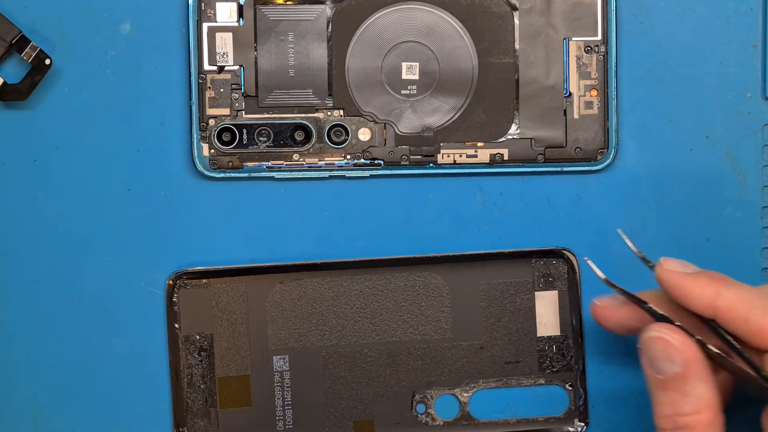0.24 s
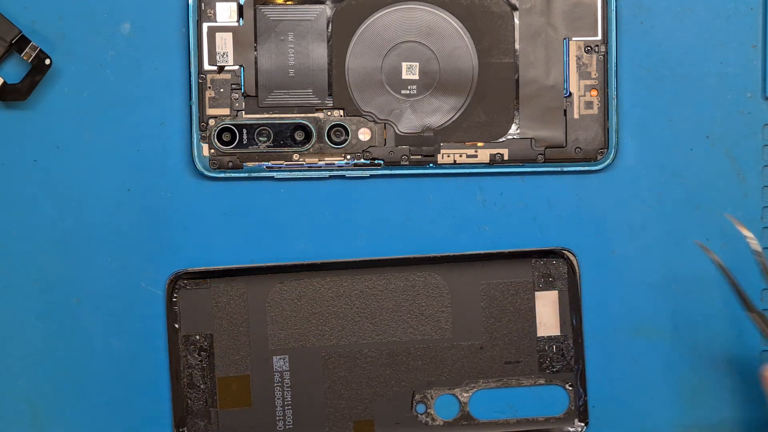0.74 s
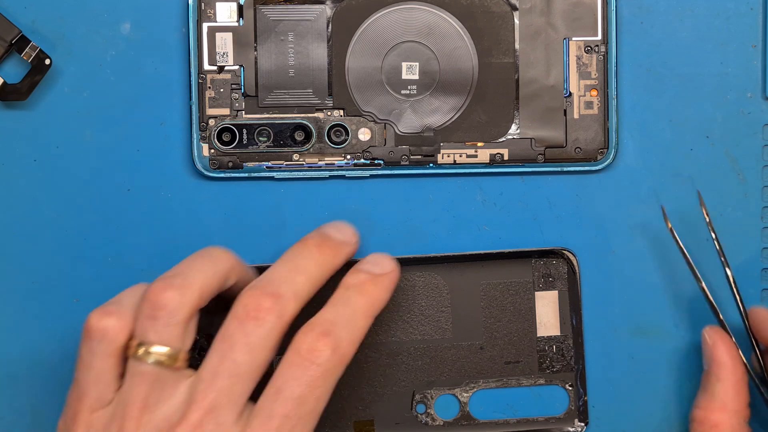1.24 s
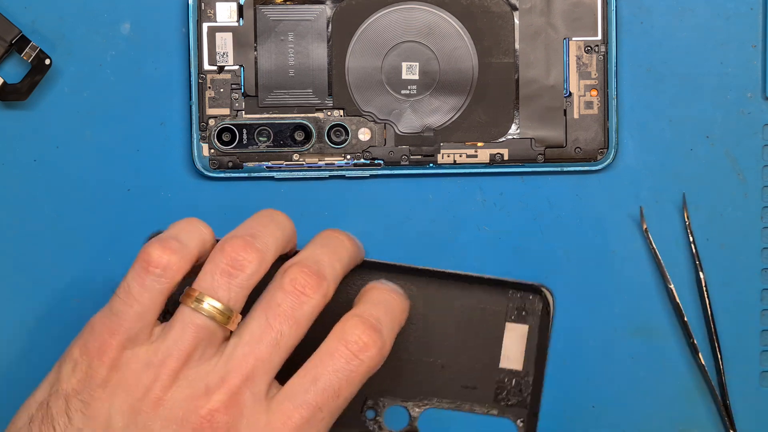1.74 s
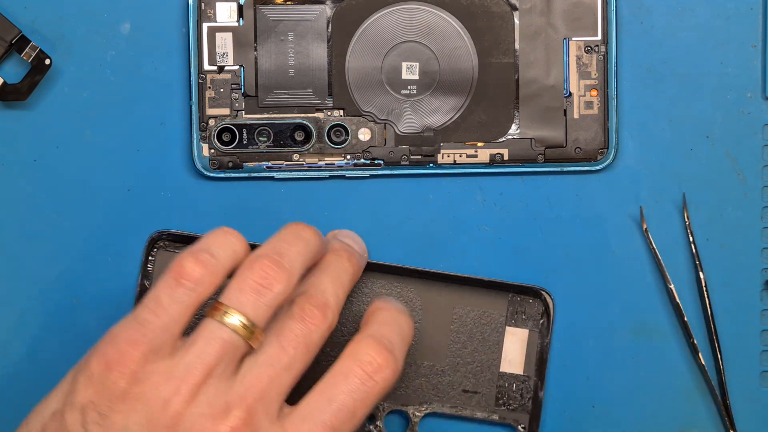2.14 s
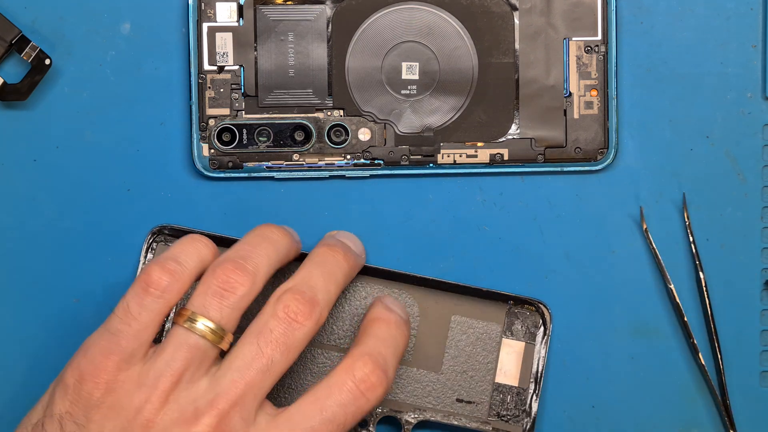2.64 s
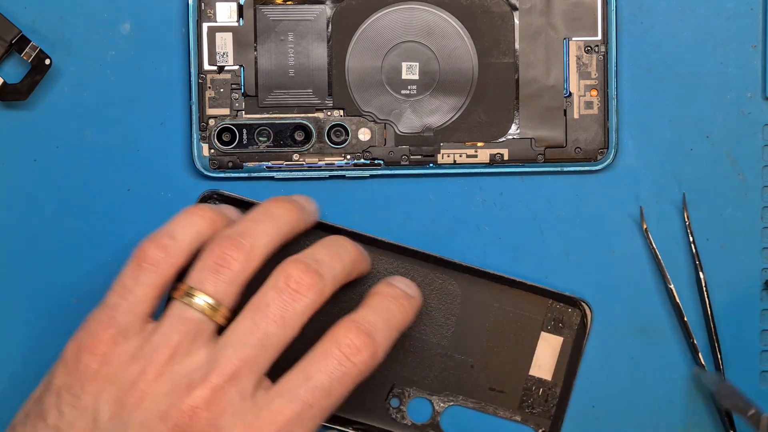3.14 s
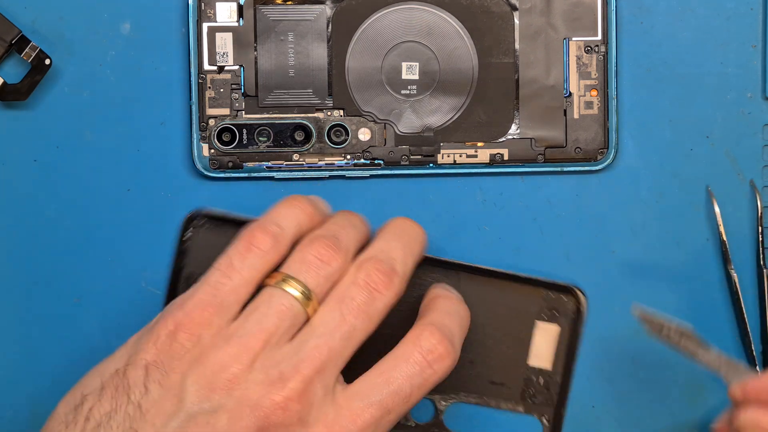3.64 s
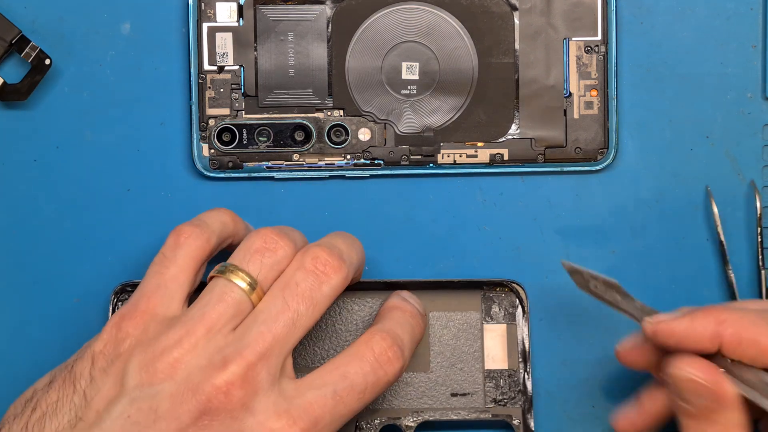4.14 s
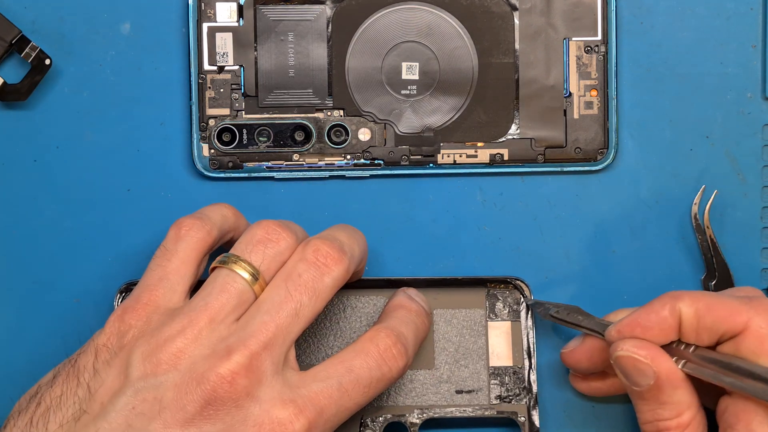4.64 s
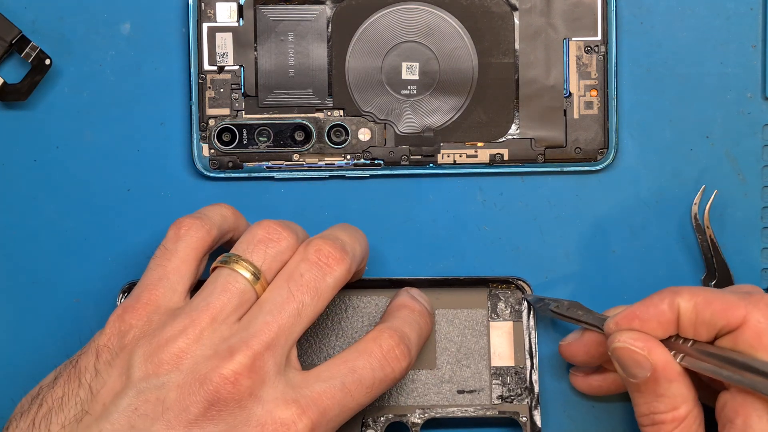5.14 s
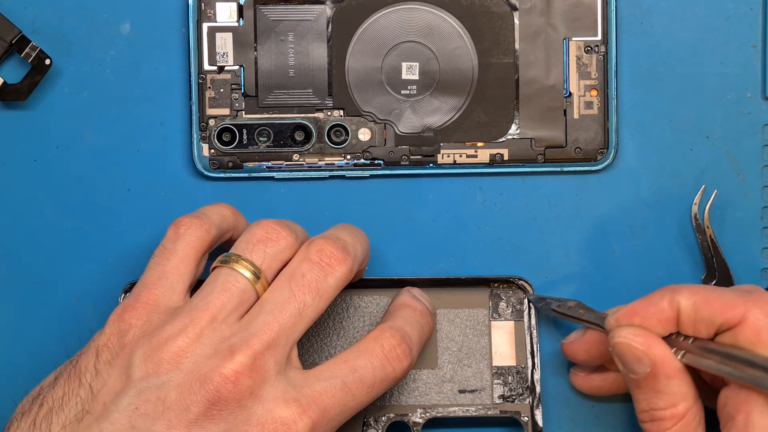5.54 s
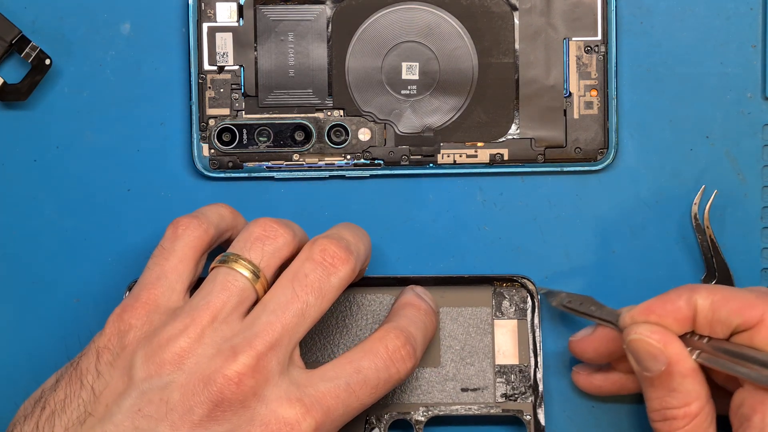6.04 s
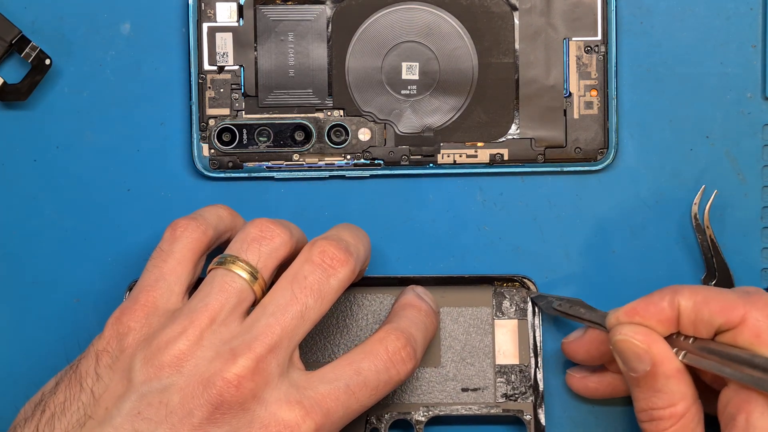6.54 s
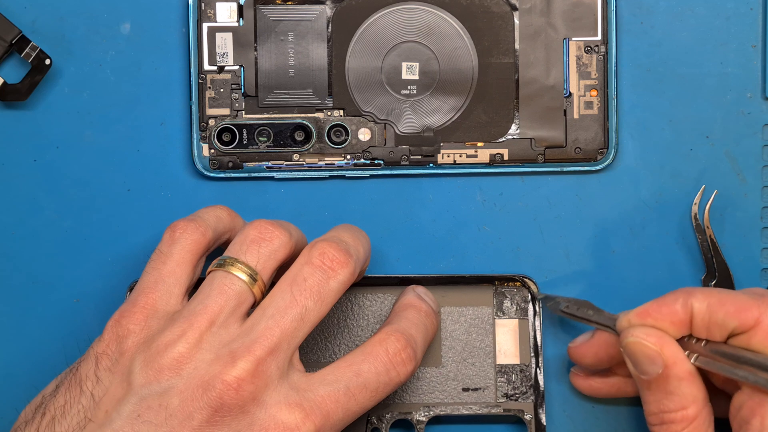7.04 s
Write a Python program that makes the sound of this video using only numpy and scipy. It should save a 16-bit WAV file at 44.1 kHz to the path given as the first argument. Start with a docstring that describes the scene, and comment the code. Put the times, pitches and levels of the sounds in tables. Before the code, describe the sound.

Close in a small room, quiet air, faint electrical hum, handling rumble and deep wavering drones run throughout; one low drone sinks in pitch over the first second. Faint rubs and tiny sticky snaps at 0.1-0.5 s lead to a light glass tick at 0.56 and a soft bump near 1.1. A strong, dull double knock lands at 1.52. Small ticks and a bump come at 1.9-2.1, then slides, a thud and crackling tape at 2.35-2.6. The brightest clatter, glass, steel and bench together, falls at 2.96-3.09. Light tweezer clinks follow at 3.2-3.5, with two dull knocks around 3.4, fainter touches to 4.0 and a bump cluster at 4.45. A near-quiet stretch holds one tiny tick at 5.45. Crisp prying snaps sound at 6.06 and 6.41, a weaker steely one at 6.76, and a barely audible tick at 7.1 as the low drone swells.

```python
'''Glass cover on a padded bench

A glass phone cover is set down and shifted on a padded workbench in a small room; steel tweezers are laid
aside and picked up, a steel tip clicks and pries at the cover's rim, and adhesive tape crackles.
Contacts are decaying noise bursts filtered by the resonances of bench, glass, rim or steel; sliding is
swelling noise. Gliding sines make the drones, fixed sines the faint hum, shaped noise the air and rumble.
'''
import sys
import numpy as np
from scipy import signal
from scipy.fft import rfft, irfft
from scipy.io import wavfile
from scipy.ndimage import uniform_filter1d

SR = 44100
rng = np.random.default_rng(int(sys.argv[2]) if len(sys.argv) > 2 else 0)


def store_pcm(level_fs):
    """Save levels as 16-bit WAV."""
    pcm = np.round(np.clip(level_fs, -1, 1) * 32767).astype(np.int16)
    wavfile.write(sys.argv[1], SR, np.atleast_2d(pcm).T)


N = 321930
TIME = np.arange(N) / SR  # s, through the scene
TAPS = 8192  # samples in one contact sound
AGE = np.arange(TAPS) / SR  # s, since a contact began
ATTACK = round(.01 * SR)  # samples over which a contact's level is set


def amp(db):
    """Decibels are twenty times the decimal logarithm of an amplitude ratio."""
    return 10 ** (np.asarray(db) / 20)


def rms(x):
    """Effective value: the root of the mean square."""
    return np.sqrt(np.mean(x ** 2) + 1e-20)


def read(points, hz):
    """Logarithmic frequency scale: values are interpolated along log frequency."""
    f, value = np.transpose(points)
    return np.interp(np.log(hz + 1), np.log(f + 1), value)


def add(mix, s, sound):
    """Superposition: a stereo sound is summed into the mix from second s."""
    part = mix[:, max(round(s * SR), 0):][:, :sound.shape[1]]
    part += sound[:, :part.shape[1]]


def noise_pair(likeness, size):
    """Partial coherence: two channels of white noise share a set part at each frequency."""
    first, other = rfft(rng.standard_normal((2, size)))
    shared = np.clip(read(likeness, np.fft.rfftfreq(size, 1 / SR)), -1, 1)
    second = shared * first + np.sqrt(1 - shared ** 2) * other
    return irfft(np.array([first, second]), size)


def tone(hz, db):
    """Phase accumulation: a sine whose pitch and rms level may move."""
    turns = np.cumsum(hz * np.ones(N)) / SR + rng.random()
    return np.sqrt(2) * amp(db) * np.sin(2 * np.pi * turns)


def ring(x, modes, uneven_db=4.5):
    """Modal resonance: x, its spectrum evened out, drives modes that each contact excites differently."""
    hz = np.fft.rfftfreq(TAPS, 1 / SR)
    shares_db = uneven_db * rng.standard_normal(len(modes))
    power = np.ones(len(hz))
    for (f, width, db), share_db in zip(modes, shares_db):
        power = power + (amp(db + share_db) / (1 + (2 * (hz - f) / width) ** 2)) ** 2
    smooth = uniform_filter1d(uniform_filter1d(abs(rfft(x)) ** 2, size=24), size=24)
    power = power / smooth
    # minimum phase: the phase follows from the log gain by a Hilbert transform
    log_gain = np.log(np.c_[power, power[:, -2:0:-1]]) / 2
    response = np.fft.ifft(np.exp(np.conj(signal.hilbert(log_gain)))).real
    return signal.fftconvolve(x, response, axes=1)[:, :TAPS]


# Edges of the four neighbouring bands in which contact levels are set, in Hz.
BAND_EDGES_HZ = [250, 1000, 3000, 7000, 16000]


def colour(x, levels_db, size):
    """Band analysis: the uppermost bands get rms levels, taken over the first size samples."""
    bands = list(zip(BAND_EDGES_HZ, BAND_EDGES_HZ[1:]))[-len(levels_db):]
    out = 0
    for band, db in zip(bands, levels_db):
        part = signal.sosfilt(signal.butter(4, band, 'band', fs=SR, output='sos'), x)
        out = out + amp(db) * part / rms(part[:, :size])
    return out


def tilted(db, tilt_db, count):
    """Spectral tilt: the level changes by one equal step from each band to the next."""
    return db + tilt_db * np.arange(count)


def glass_levels(db, tilt_db, shape_db):
    """Spectral envelope of a contact on glass: brightness tilts the bands above 1 kHz."""
    return np.r_[db, tilted(db, tilt_db, count=3)] + shape_db


# Left-right likeness of a contact's noise. Each row: frequency in Hz, likeness (1 = identical).
CHATTER_LIKENESS = [(200, 0.98), (550, 0.76), (850, .3), (1200, -0.16), (2500, 0)]


def contact(t60, rise, grain_db):
    """Contact chatter: a burst of uneven tiny impacts swells and decays exponentially."""
    chatter = noise_pair(CHATTER_LIKENESS, TAPS)
    unevenness = np.interp(AGE, AGE[::24], rng.standard_normal(TAPS)[::24])
    swell = 1 - np.exp(-(AGE / rise) ** 2)
    return chatter * amp(grain_db * unevenness) * swell * amp(-60 * AGE / t60)


def hit(t60, levels_db, modes, rise, grain_db):
    """Impulsive excitation: a short hard contact rings the modes of a body."""
    return colour(ring(contact(t60, rise, grain_db), modes, uneven_db=3.0), levels_db, ATTACK)


# Spectrum of the room air. Each row: frequency in Hz, relative density in dB.
AIR_SPECTRUM = [(60, -7.5), (220, -11.5), (400, -15.5), (550, -28), (1100, -24.5), (1500, -34.5),
                (2200, -42.5), (3200, -34), (4200, -45), (6000, -50.5), (8000, -65), (13000, -55),
                (16000, -65)]
# Left-right likeness of the air. Each row: frequency in Hz, likeness (clipped to -1..1).
AIR_LIKENESS = [(60, 1), (130, 0.036), (290, 0.99), (640, 0.3), (1410, -0.31), (3100, 0.27), (6820, -1.3),
                (15000, 0.62)]
AIR_DB = -52.5  # rms


def air():
    """Stationary noise: steady room air with a fixed spectrum."""
    hz = np.fft.rfftfreq(N, 1 / SR)
    noise = irfft(rfft(noise_pair(AIR_LIKENESS, N)) * amp(read(AIR_SPECTRUM, hz)), N)
    return amp(AIR_DB) * noise / rms(noise)


# Spectrum of the rumble. Each row: frequency in Hz, relative density in dB.
RUMBLE_SPECTRUM = [(15, -9), (28, 10), (42, -5.5), (65, 4.5), (100, -5), (150, -15), (260, -47),
                   (600, -63.5)]
# Rumble level as the hands work. Each row: time in seconds, rms level in dB.
HANDLING = [(0, -42), (1.9, -46), (2.6, -39.5), (3.0, -47.5), (3.5, -34.5), (3.9, -45.5), (5.6, -50.5),
            (6.8, -45), (7.3, -44)]


def rumble():
    """Amplitude modulation: low noise follows the hands on the bench."""
    hz = np.fft.rfftfreq(N, 1 / SR)
    noise = irfft(rfft(rng.standard_normal(N)) * amp(read(RUMBLE_SPECTRUM, hz)), N)
    level_db = np.interp(TIME, *np.transpose(HANDLING))
    return amp(level_db) * noise / rms(noise)


# Electrical hum. Each row: frequency in Hz, rms level in dB.
HUM = [(100, -61.5), (200.5, -58.5)]


def hum():
    """Line spectrum: the faint electrical hum is a sum of steady sines."""
    return sum(tone(hz, db) for hz, db in HUM)


# A low drone's path. Each row: time in seconds, frequency in Hz, rms level in dB before the lift.
SINKING = [(0.0, 102, -37), (0.028, 99.3, -41), (0.328, 97.5, -51.5), (0.428, 91.1, -36),
           (0.666, 81.4, -39.5), (0.698, 77.2, -44.5), (0.932, 72.9, -33), (1.056, 64.8, -41.5),
           (1.15, 65, -48)]


def sinking_drone(lift_db=3.0, release_s=0.073):
    """Frequency glide: a low drone sinks in pitch and dies away."""
    s, hz, db = np.transpose(SINKING)
    release = np.interp(TIME, [s[-1], s[-1] + release_s], [1, 0])
    return release * tone(np.interp(TIME, s, hz), np.interp(TIME, s, db) + lift_db)


# Deep tones. Each row: start in seconds, end in seconds, first frequency in Hz, last frequency in Hz,
# rms level in dB before fades and waver.
DRONES = [(-.2, 1.62, 52, 56.7, -43.5), (1.05, 2.1, 65, 60.5, -47), (1.45, 2.95, 126, 132.5, -42),
          (2.4, 4.74, 53.8, 57.45, -42.5), (4.6, 6.2, 55, 51.04, -52.5), (4.549, 5.63, 60, 61.14, -41),
          (5.399, 6.43, 63, 63.06, -46), (6.75, 7.6, 61.5, 58, -34)]
DRONE_FADE_S, WAVER_DB, WAVER_PER_S = 0.29, -1.76, 5.5  # waver: random dB scale, new values a second


def drones():
    """Beating: deep tones glide, waver and interfere where they overlap."""
    out = np.zeros(N)
    for start, end, first_hz, last_hz, db in DRONES:
        fade = np.clip(np.minimum(TIME - start, end - TIME) / DRONE_FADE_S, 0, 1)
        chance = rng.standard_normal(size=100)
        waver_db = WAVER_DB * np.interp(TIME * WAVER_PER_S, np.arange(len(chance)), chance)
        glide_hz = np.interp(TIME, [start, end], [first_hz, last_hz])
        out = out + fade * tone(glide_hz, db + waver_db)
    return out


# Resonances of the glass. Each row: frequency in Hz, width in Hz, gain in dB before random unevenness.
GLASS = [(530, 90, 22), (850, 90, 17), (1223, 71, 11), (1627, 250, 11), (2285, 150, 7.6), (2950, 230, 7.2),
         (3280, 130, 11.6), (4470, 1200, 15), (5470, 670, 12), (6350, 280, 6.5), (9500, 2000, 12),
         (11700, 930, 8), (13250, 900, 10)]
# Fingers and cover sliding. Each row: start in seconds, end in seconds (length held to 0.02-0.17 s),
# level in dB before the mix gain, brightness in dB per band.
RUBS = [(0.098, 0.192, -68.5, 1), (.31, 0.41, -61.5, 1.5), (0.404, .58, -68.5, 5),
        (2.031, 2.089, -52.5, -3.5), (2.34, 2.42, -49.5, -9.5), (2.474, 2.624, -57, -7.5),
        (2.702, 2.724, -55, 0), (3.004, 3.067, -44, -10.5), (3.487, 3.578, -64, 2.5)]


def rubs(grain_db=6):
    """Stick-slip friction: an uneven run of tiny slips swells, fades and rings the glass."""
    out = np.zeros((2, N))
    for start, end, db, tilt_db in RUBS:
        length = np.clip(end - start, .02, .17)
        slips = amp(grain_db * np.interp(AGE, AGE[::90], rng.standard_normal(TAPS)[::90]))
        swell = np.sin(np.pi * np.minimum(AGE / length, 1))
        friction = ring(rng.standard_normal((2, TAPS)) * slips * swell, GLASS)
        add(out, start, colour(friction, tilted(db, tilt_db, count=3), round(length * SR)))
    return out


# Sticky tape letting go. Each row: time in seconds, level in dB before the mix gain,
# brightness in dB per band.
TAPE = [(0.141, -76.5, 16), (0.325, -55.5, -0.5), (.462, -74, 19), (2.574, -41.5, -8), (2.593, -50.5, 7.5),
        (2.605, -54, 13), (2.615, -53, 9)]
TAPE_T60_S, TAPE_BODY_DB = 0.022, -10  # the body is the 1-3 kHz part, relative to the snap


def tape():
    """Sudden release: adhesive lets go in short, bright snaps."""
    out = np.zeros((2, N))
    modes = [(5000, 1500, 4), (14000, 3000, 5)]  # Hz, width Hz, dB
    for s, db, tilt_db in TAPE:
        levels_db = np.r_[db + TAPE_BODY_DB, tilted(db, tilt_db, count=2)]
        add(out, s, hit(TAPE_T60_S, levels_db, modes, rise=.002, grain_db=4))
    return out


# Hard ticks on the glass. Each row: time in seconds, level in dB before shape and mix gain,
# brightness in dB per band, contact t60 in seconds, favoured resonance in Hz, its gain in dB.
CLICKS = [(0.56, -45.5, -2, 0.074, 4950, 5.5), (1.02, -45.5, -27.5, 0.013, 2812, 18.5),
          (1.909, -53.5, -5, 0.06, 4770, 41), (2.462, -45.5, -6, 0.06, 1750, 2),
          (2.98, -28, -12.5, 0.037, 2290, 17.5), (3.056, -37.5, 4.5, 0.026, 3365, 18.5),
          (3.463, -52, -2.5, 0.065, 3200, 18), (3.961, -51.5, -18, .015, 2280, 21.5),
          (3.978, -48, -19.5, .015, 876, 20.5), (5.449, -60.5, -10.5, .017, 3450, 13),
          (7.115, -61.5, -9.5, .02, 1550, 12.5)]
# Shape of a tick, in dB for 250 Hz-1 kHz, 1-3 kHz, 3-7 kHz and 7-16 kHz.
CLICK_SHAPE_DB = [-12.5, -0.5, 2.5, -1.5]


def clicks(spot_width_hz=280):
    """Point excitation: steel ticks on the glass, each spot favouring one resonance."""
    out = np.zeros((2, N))
    for s, db, tilt_db, t60, spot_hz, spot_db in CLICKS:
        modes = GLASS + [(spot_hz, spot_width_hz, spot_db)]
        levels_db = glass_levels(db, tilt_db, CLICK_SHAPE_DB)
        add(out, s, hit(t60, levels_db, modes, rise=0.00093, grain_db=7.5))
    return out


def soften(x, corner_hz, order):
    """Contact duration: a soft contact lasts longer and so loses its treble."""
    return signal.sosfilt(signal.butter(order, min(corner_hz, SR / 2.1), fs=SR, output='sos'), x)


# Slow swings of the bench top. Each row: frequency in Hz, relative level in dB, t60 in seconds.
THUMP = [(106.8, -0.5, 0.21), (122.9, -5, 0.2), (145, -11.5, 0.27), (186, -11, 0.1), (220, -18, 0.067)]
THUMP_RISE_S = 0.0025


def bench_swing():
    """Damped oscillation: low modes of the bench top decay together, at unit rms over 20 ms."""
    swing = sum(amp(db - 60 * AGE / t60) * np.sin(2 * np.pi * hz * AGE) for hz, db, t60 in THUMP)
    swing = swing * (1 - np.exp(-AGE / THUMP_RISE_S))
    swing = signal.sosfilt(signal.butter(3, 60, 'high', fs=SR, output='sos'), swing)
    return swing / rms(swing[:2 * ATTACK])


# Resonances of the bench with the cover on it. Each row: frequency in Hz, width in Hz,
# gain in dB before random unevenness.
BENCH = [(230, 60, -1.5), (315, 80, 11), (401, 100, 10.5), (466.5, 110, 15), (559.5, 79, 18),
         (641.7, 94, 16), (734, 80, 17.5), (830, 110, 16.5), (906, 80, 16), (1075, 60, 10),
         (1247, 160, 14.5), (1432, 140, 15.5), (1640, 154, 11), (1830, 570, 15.5), (2267, 300, 12),
         (2780, 180, 15.5), (3295, 250, 13), (3630, 530, 14), (4375, 1500, 10)]
# Blows of cover and hand on the bench. Each row: time in seconds, thump level in dB,
# clack level in dB (250 Hz-1 kHz), crack level in dB before its shape, contact t60 in seconds.
KNOCKS = [(1.095, -37, -44, -85, 0.019), (1.112, -47.5, -46, -70, .03), (1.520, -31, -29, -46.5, 0.06),
          (1.536, -18, -17.5, -28.5, 0.025), (1.612, -33.5, -43.5, -69, .012),
          (2.086, -37.5, -47, -59.5, 0.26), (2.46, -60, -47.5, -61.5, .05), (2.571, -29, -34.5, -48.5, .05),
          (2.98, -27.5, -41, -43, 0.078), (2.991, -54, -42.5, -41, 0.11), (3.024, -32.5, -40.5, -47, 0.03),
          (3.04, -32, -48, -42.5, 0.023), (3.057, -19, -59.5, -62, .03), (3.087, -32.5, -61, -67, .03),
          (3.381, -28.5, -35.5, -50, .06), (3.425, -26, -35.5, -55.5, 0.07),
          (3.98, -39.5, -43.5, -64, 0.019), (4.435, -35.5, -51.5, -77, 0.024),
          (4.464, -38, -35.5, -62.5, 0.055), (4.475, -28.5, -39, -61.5, 0.059),
          (4.524, -46.5, -45.5, -64, 0.024), (6.062, -39.5, -55, -63, 0.038), (6.409, -43, -53, -62, .03)]
# Shape of a blow's crack, in dB for 1-3 kHz, 3-7 kHz and 7-16 kHz.
CRACK_SHAPE_DB = [1, -12.5, -26]
# A clack of HARD_BLOW_DB has its treble corner at HARD_BLOW_HZ; the corner rises with force.
HARD_BLOW_DB, HARD_BLOW_HZ, BLOW_DB_PER_OCTAVE = -12.5, 893, 20.5


def knocks():
    """Impact on a padded plate: a dull clack over the swing of the bench top."""
    out = np.zeros((2, N))
    swing = bench_swing()
    for s, thump_db, clack_db, crack_db, t60 in KNOCKS:
        levels_db = np.r_[clack_db, crack_db + np.array(CRACK_SHAPE_DB)]
        # a harder blow is a shorter contact, and so brighter
        corner_hz = HARD_BLOW_HZ * 2 ** ((clack_db - HARD_BLOW_DB) / BLOW_DB_PER_OCTAVE)
        rung = ring(contact(t60, rise=0.0037, grain_db=8.0), BENCH, uneven_db=4.0)
        clack = soften(rung, corner_hz, order=2)
        clack = clack + amp(-26) * soften(clack, corner_hz=3800, order=2)
        add(out, s, colour(clack, levels_db, ATTACK) + amp(thump_db) * swing)
    return out


# Resonances of the tweezers. Each row: frequency in Hz, width in Hz, gain in dB before random unevenness.
STEEL = [(3450, 300, 10), (6020, 850, 16.5), (6180, 680, 9), (9340, 450, 17), (9440, 250, 20.5),
         (12000, 391, 20.5), (13430, 300, 24.5), (13070, 500, 5)]
# Tweezer arms touching. Each row: time in seconds, level in dB before the mix gain,
# brightness in dB per band, contact t60 in seconds.
CLINKS = [(1.912, -53.5, -40, 0.019), (2.312, -79, 16.5, 0.015), (2.726, -67.5, 9.5, 0.054),
          (2.964, -55, -1.5, .1), (2.978, -55, 6, 0.053), (3.006, -62.5, 12.5, 0.2), (3.195, -78, 25, 0.03),
          (3.272, -56.5, 14, 0.041), (3.377, -66.5, 3.5, 0.052), (3.523, -53, 8, 0.036),
          (3.72, -79, 0, .046), (3.85, -80.5, -1, 0.093), (6.76, -49.5, 1.5, 0.027)]


def clinks():
    """Vibration of bars: the springy arms of the tweezers brush together and ring."""
    out = np.zeros((2, N))
    for s, db, tilt_db, t60 in CLINKS:
        add(out, s, hit(t60, tilted(db, tilt_db, count=2), STEEL, rise=.003, grain_db=2))
    return out


# Resonances of the cover's rim. Each row: frequency in Hz, width in Hz, gain in dB before random unevenness.
RIM = [(511, 123, 14), (792, 68, 7.5), (1220, 67, 7.5), (1548, 190, 18), (2210, 410, 17), (2870, 280, 15.5),
       (3315, 220, 16), (4240, 350, 8.5), (4730, 720, 13.5), (5430, 840, 9), (6120, 570, 9.5),
       (9870, 1500, 7), (11500, 1200, 9), (13200, 1100, 10)]
# The steel tip pries at the rim and slips off. Each row: time in seconds, level in dB before shape
# and mix gain, brightness in dB per band, contact t60 in seconds, favoured resonance in Hz.
PRIES = [(6.06, -32.5, 0, 0.034, 3380), (6.4077, -33.5, 1.5, 0.018, 5520), (6.759, -50, -3, 0.046, 6500)]
# Shape of the snap, in dB for 250 Hz-1 kHz, 1-3 kHz, 3-7 kHz and 7-16 kHz.
PRY_SHAPE_DB = [-4.5, -1.5, .5, -2.5]
# a duller scrape leads each snap; its level and tilt are relative to the snap's
SCRAPE_LEAD_S, SCRAPE_DB, SCRAPE_TILT_DB, SCRAPE_T60_S = .0075, -6.5, -5.5, 0.072


def pries(spot_width_hz=200, spot_db=17):
    """Slip and release: the steel tip scrapes for an instant, then snaps off the rim."""
    out = np.zeros((2, N))
    for s, db, tilt_db, t60, spot_hz in PRIES:
        modes = RIM + [(spot_hz, spot_width_hz, spot_db)]
        scrape_db = glass_levels(db + SCRAPE_DB, tilt_db + SCRAPE_TILT_DB, PRY_SHAPE_DB)
        snap_db = glass_levels(db, tilt_db, PRY_SHAPE_DB)
        add(out, s - SCRAPE_LEAD_S, hit(SCRAPE_T60_S, scrape_db, modes, rise=0.0034, grain_db=1))
        add(out, s, hit(t60, snap_db, modes, rise=0.0016, grain_db=2))
    return out


# Decay of the room's tail. Each row: frequency in Hz, t60 in seconds.
ROOM_T60 = [(100, 1), (400, 0.37), (1200, .48), (3000, 0.4), (6000, 0.4), (10000, 0.28), (16000, 0.38)]


def room(x, early_db, early_t60, tail_db):
    """Reverberation: quick reflections off the bench, and a tail that decays by frequency."""
    diffuse = noise_pair([(150, 0.89), (500, 0.73), (1100, 0.18)], SR)  # Hz, left-right likeness
    hz, t, z = signal.stft(diffuse, SR, nperseg=256)
    decay = amp(-60 * t / read(ROOM_T60, hz)[:, None])
    tail = signal.istft(z * decay, SR, nperseg=256)[1][:, :SR]
    t = np.arange(SR) / SR
    tail = tail * np.clip((t - .008) / 0.0013, 0, 1)
    # sparse reflections: one sample in twenty, after 3 ms
    sparse = (rng.random(SR) < .05) * (t > .003)
    early = rng.standard_normal((2, SR)) * sparse * amp(-60 * t / early_t60)
    response = amp(tail_db) * tail / np.linalg.norm(tail[0])
    response = response + amp(early_db) * early / np.linalg.norm(early[0])
    response = signal.sosfilt(signal.butter(2, 200, 'high', fs=SR, output='sos'), response)
    return x + signal.fftconvolve(x, response, axes=1)[:, :N]


def scene():
    """Superposition: glass, tape and steel a little to the left, knocks, drones, hum, air and rumble."""
    left = amp([[1.1], [-1.1]])
    glass = amp(-3.5) * clicks() + amp(-1.0) * tape() + amp(-9.5) * rubs()
    bright = room(glass * left, early_db=-6.5, early_t60=0.033, tail_db=-9)
    steel = room(amp(1.0) * clinks() * left, early_db=-9.5, early_t60=.03, tail_db=-14.5)
    snaps = room(amp(-4) * pries() * left, early_db=-10.5, early_t60=.06, tail_db=-11)
    dull = room(knocks(), early_db=-11.5, early_t60=.1, tail_db=-8.5)
    low_tones = hum() + sinking_drone() + drones()
    return dull + bright + steel + snaps + low_tones + air() + rumble()


CUTOFF_HZ = 15900


def record(dry):
    """Band limitation: a linear-phase low-pass filter removes the highest treble."""
    low_pass = signal.firwin(511, CUTOFF_HZ, window=("kaiser", 9), fs=SR)
    return signal.oaconvolve(dry, low_pass[None], "same")


dry = scene()
out = record(dry)
store_pcm(out)
```